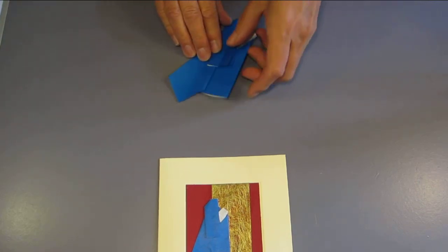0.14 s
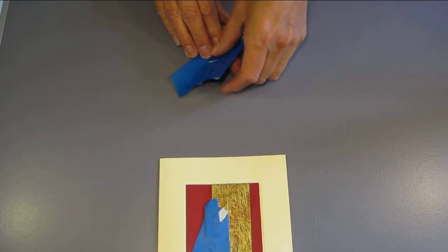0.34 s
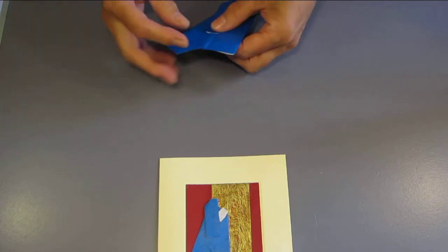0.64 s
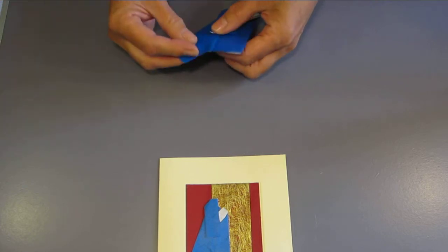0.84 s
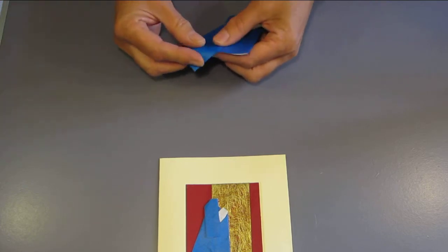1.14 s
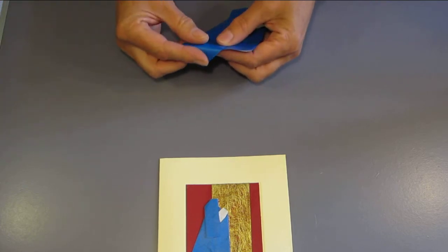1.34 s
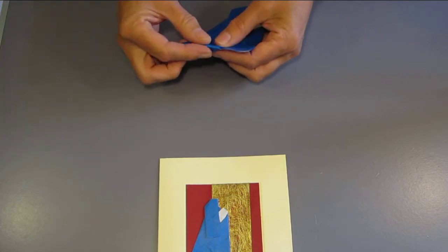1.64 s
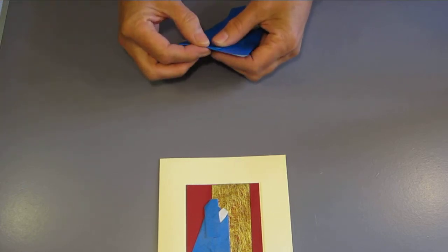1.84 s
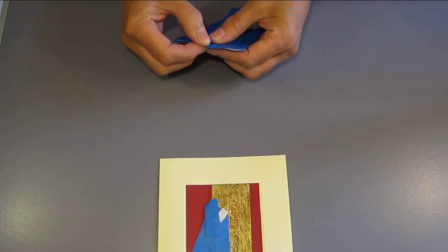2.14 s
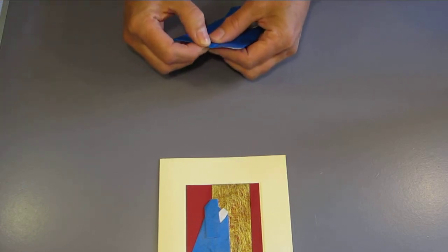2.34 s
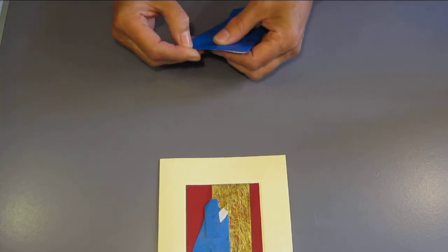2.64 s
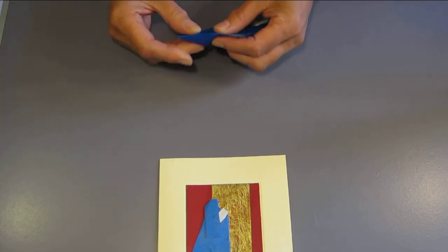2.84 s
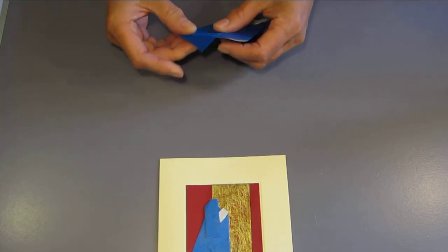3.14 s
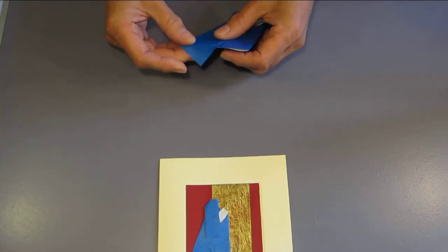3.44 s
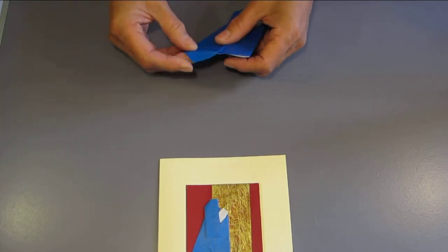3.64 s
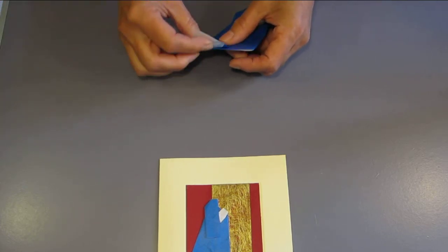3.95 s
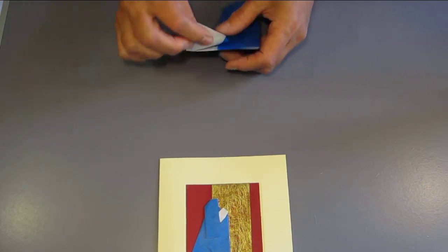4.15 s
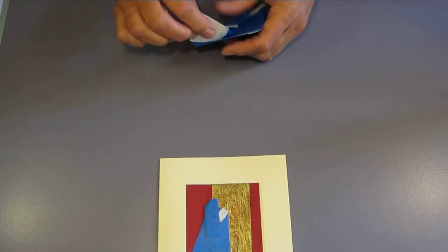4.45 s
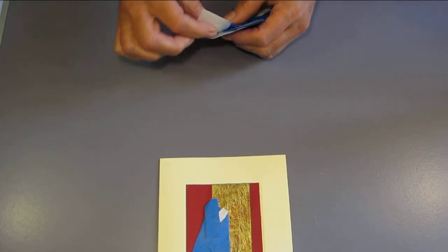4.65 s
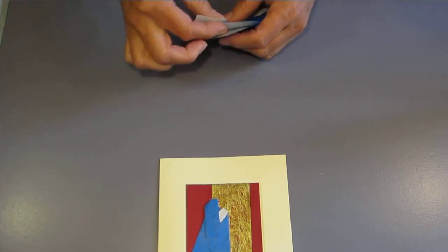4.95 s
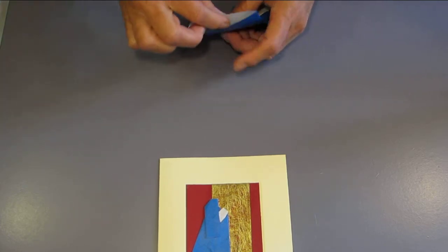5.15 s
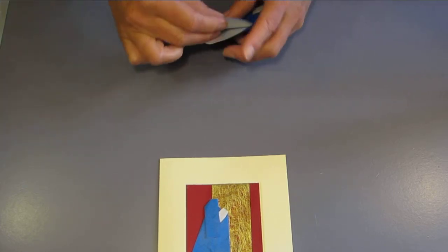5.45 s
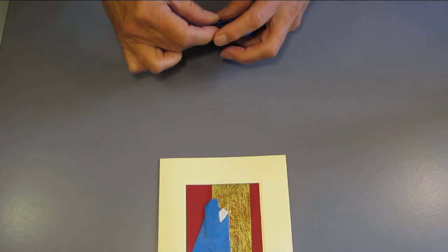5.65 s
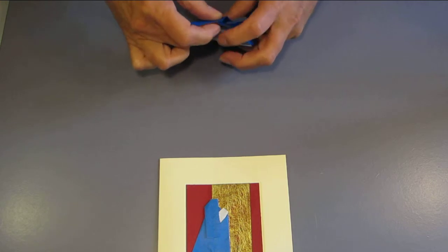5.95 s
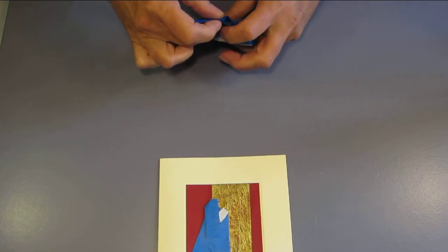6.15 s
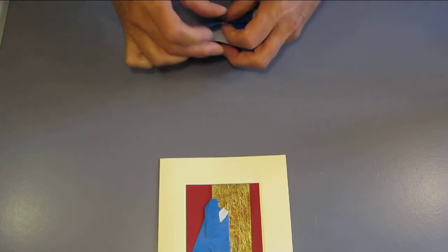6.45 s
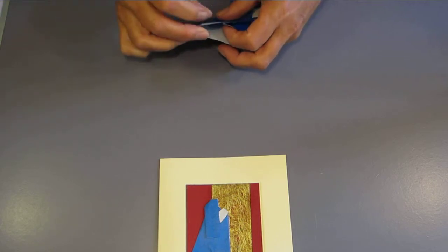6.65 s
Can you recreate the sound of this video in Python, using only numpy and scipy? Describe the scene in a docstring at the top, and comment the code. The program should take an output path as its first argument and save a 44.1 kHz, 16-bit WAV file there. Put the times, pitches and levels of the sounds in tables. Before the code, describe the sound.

Close to the microphone in a small room, fingers fold stiff paper. Dull table scuffs and crisp crackles open, followed by scattered snaps and light rubbing. The handling softens, then grows harder after four seconds, with one sharpest crease near six. Low ventilation hum, soft hiss and a very thin high whine stay underneath.

```python
"""Close to one microphone in a small room, two hands fold a small sheet of stiff paper just above a table.
Ventilation hum, hiss and a thin whine (filtered noise) lie under it all; at first the sheet scuffs the
tabletop (ringing noise), with three fainter scuffs later. Fingers and layers rub with gritty hiss and tiny
ticks, and creases snap (millisecond slip bursts): crisp in the first two seconds, softer up to about four,
then harder, the hardest at 6.06 s. The room answers each sound with a short tail."""
import sys
import numpy as np
from scipy import signal
from scipy.fft import rfft, irfft
from scipy.io import wavfile
from scipy.ndimage import uniform_filter1d

SR = 44100
rng = np.random.default_rng(int(sys.argv[2]) if len(sys.argv) > 2 else 0)


def wrap_up_sound(samples):
    """Save the sound to the file named by the first command line argument, as 16-bit audio."""
    columns = np.atleast_2d(samples).T
    # keep every value between -1 and 1, then stretch to whole-number steps
    tamed = np.clip(columns, -1, 1)
    steps = np.round(tamed * 32767).astype(np.int16)
    wavfile.write(sys.argv[1], SR, steps)


N = 299439
TOP_HZ = 16000  # upper limit of the recorder and of every resonance


def undb(db):
    """Decibels to gain."""
    return 10 ** (np.asarray(db) / 20)


def unit(x):
    """Scale to rms 1."""
    return x / np.sqrt(np.mean(x ** 2))


def colour(x, points):
    """Shape x with a spectrum of (frequency [Hz], level [dB]) points, joined over log frequency."""
    hz, db = np.transpose(points)
    f = np.maximum(np.fft.rfftfreq(len(x), 1 / SR), 1)
    gain = undb(np.interp(np.log(f), np.log(hz), db))
    return irfft(rfft(x) * gain, len(x))


def ring(x, hz, q):
    """A resonance with gain 1 at its centre."""
    b, a = signal.iirpeak(min(hz, TOP_HZ), max(q, 1), fs=SR)
    return signal.lfilter(b, a, x)


def walk(rate):
    """Slow chance: `rate` random levels a second joined by ramps, rms 1."""
    size = max(int(SR / rate), 2)
    steps = np.repeat(rng.standard_normal(N // size + 1), size)
    return unit(uniform_filter1d(steps, size)[:N])


def slips(rate, spread_db):
    """Tiny stick-slip clicks at random moments, `rate` a second, a few much larger than the rest."""
    size = undb(spread_db * np.minimum(rng.exponential(size=N), 5))
    happens = rng.random(N) < rate / SR
    return unit(happens * size * rng.choice([-1, 1], N))


def even(x, smooth):
    """Spread a burst's energy more evenly over frequency, keeping its timing."""
    spectrum = rfft(x)
    power = uniform_filter1d(np.abs(spectrum) ** 2, size=9)
    floor = power.mean() / 20
    return irfft(spectrum / (power + floor) ** (smooth / 2), len(x))


# ventilation hum before its level below: (frequency [Hz], density [dB per Hz])
HUM_SPECTRUM = [(20, -88.5), (60, -90.5), (130, -92), (220, -93), (330, -97), (600, -103), (1200, -112),
                (4000, -135)]
# the hum eases, swells slightly around the middle, then eases further: (time [s], level [dB])
HUM_EASING = [(0, 3), (1.203, 1), (3.8, 2), (5.5, -0.5), (6.8, -1.5)]
# microphone hiss: (frequency [Hz], density [dB per Hz])
HISS_SPECTRUM = [(300, -105), (1300, -103.5), (2500, -106), (5000, -109), (10000, -112), (13000, -116),
                 (16000, -122)]
# whine of the electronics: (frequency [Hz], half the bandwidth of each filter pass [Hz], rms level [dB])
WHINE_LINES = [(7840, 76, -81), (13450, 82, -89)]


def background(waver_db=1):
    """Broadband noise wavers as ventilation hum or stays steady as hiss; narrow noise bands whine."""
    hum_db = np.interp(np.arange(N) / SR, *np.transpose(HUM_EASING)) + waver_db * walk(rate=5.5)
    hum = colour(rng.standard_normal(N), HUM_SPECTRUM) * undb(hum_db)
    hiss = colour(rng.standard_normal(N), HISS_SPECTRUM)
    whine = 0
    for hz, half_width, db in WHINE_LINES:
        q = hz / half_width / 2
        line = ring(ring(rng.standard_normal(N), hz, q), hz, q)
        whine = whine + undb(db) * unit(line)
    return (hum + hiss) * np.sqrt(SR / 2) + whine  # from density per Hz to sample level


# colour of the room's answer: (frequency [Hz], level [dB])
ROOM_COLOUR = [(150, 1), (500, 7), (700, -0.5), (1000, 5), (1500, -1.5), (2400, -2), (3200, -2), (4100, 4),
               (6000, -2), (9000, -1.5), (12000, -6.5), (15000, -5)]


def room(x, t60=0.33, tail_db=-8, early_db=-14, early_s=0.011, gap_s=0.0033, build_s=0.0051):
    """Quick scatter from hands and table, then the diffuse tail of the walls."""
    t = np.arange(SR // 2) / SR
    late = np.maximum(t - gap_s, 0)
    tail = rng.standard_normal(len(t)) * (1 - np.exp(-late / build_s)) * np.exp(-np.log(1000) * t / t60)
    sparse = rng.standard_normal(len(t)) ** 3  # cubing leaves a few strong reflections
    early = sparse * (t > gap_s / 2) * np.exp(-t / early_s)
    response = (undb(tail_db) * unit(tail) + undb(early_db) * unit(early)) / np.sqrt(len(t))
    return colour(signal.fftconvolve(x, response), ROOM_COLOUR)[:N]


def echo(x, lag_s=0.016, hz=1950, db=-13):
    """One dull reflection from a nearby surface."""
    return undb(db) * np.pad(ring(x, hz, q=1.8), (int(lag_s * SR), 0))[:N]


# paper and fingertips drag on the table:
# (start time [s], length [s], resonance [Hz], level [dB], about 3 dB above the drag's rms)
TABLE_DRAGS = [(0.0, 0.07, 501, -61.5), (0.316, 0.012, 516, -51), (0.331, 0.026, 503, -61),
               (0.36, 0.029, 497, -50.5), (1.638, 0.038, 662, -60.5), (2.856, 0.027, 497, -57.5),
               (3.1, 0.03, 694, -60.5)]


def drags(q=8, upper_db=-8):
    """Stick-slip on the tabletop: noise through two resonances makes a dull, hollow scuff."""
    t, out = np.arange(N) / SR, 0
    friction = rng.standard_normal(N)
    for s, length, hz, db in TABLE_DRAGS:
        stroke = np.sqrt(np.maximum(1 - (2 * (t - s) / length - 1) ** 2, 0))
        lower = unit(ring(ring(friction, hz, q / 2), hz, q))
        upper = unit(ring(ring(friction, 1.53 * hz, q), 1.53 * hz, q))
        scuff = unit(stroke * (lower + undb(upper_db) * upper))
        out = out + undb(db) * scuff * np.sqrt(length * SR / N / 2)
    return out


# edges of the sheet's four registers, thud, body, crack and fizz: (frequency [Hz])
REGISTER_EDGES = [350, 1050, 2900, 7200, 16000]


def register(x, index):
    """One of the sheet's four registers."""
    band = REGISTER_EDGES[index:index + 2]
    return signal.sosfilt(signal.butter(3, band, "bandpass", fs=SR, output="sos"), x)


# how well the sheet radiates: (frequency [Hz], level [dB])
SHEET_RADIATION = [(350, 2), (700, 8), (950, -3.5), (1350, 0.5), (1750, -1), (2400, 1.5), (3600, 2),
                   (5000, 8.5), (7500, -2), (9400, -2.5), (12000, -3), (13200, -8.5), (15500, -12),
                   (16200, -19)]


def radiate(x):
    """The thin sheet sends some frequencies into the air better than others."""
    return colour(x, SHEET_RADIATION)


# the held sheet rustles faintly under the fingers, level at step 0: (time [s], level [dB])
GRIP_RUSTLE = [(0, -68.5), (.48, -68.5), (.64, -74), (1, -69.5), (1.7, -80), (2.05, -75.5), (2.63, -81),
               (3.05, -74), (3.25, -82), (3.7, -68.5), (4.7, -67), (5.15, -75), (5.45, -68), (6.18, -68.5),
               (6.33, -73.5), (6.62, -81), (6.79, -69.5)]
# a finger or a layer of paper slides: (start time [s], length [s], share of length spent speeding up,
# peak level at step 0 [dB], brightness [dB per step])
SLIDE_STROKES = [(0.0, 0.041, 0.13, -59.5, 10), (0.085, 0.16, 0.34, -63.5, 2),
                 (0.193, .12, 0.18, -61.5, 3.5), (0.312, 0.15, 0.26, -57, -6),
                 (0.734, 0.12, 0.6, -68.5, -6), (0.805, 0.16, 0.39, -66, 7), (1.3, 0.07, 0.8, -62, 7.5),
                 (1.4, 0.24, 0.5, -66.5, 4), (1.769, 0.13, 0.13, -62, 9), (1.97, 0.12, 0.88, -67.5, 3),
                 (2.383, 0.14, .1, -63, 8), (2.431, 0.17, 0.68, -62, 8), (2.665, .11, 0.62, -61.5, 4),
                 (2.795, 0.12, 0.4, -63, 1), (2.905, 0.063, 0.64, -64, -2.5), (3.079, .08, 0.58, -64, 5),
                 (3.394, 0.13, 0.37, -66, 3), (3.5, 0.12, 0.36, -67.5, -10.5), (3.57, .15, .6, -66.5, 1),
                 (3.735, 0.2, 0.25, -64.5, 5), (3.908, 0.17, 0.56, -66, -6),
                 (4.031, 0.17, 0.81, -59.5, 9.5), (4.275, 0.18, 0.33, -59.5, 2),
                 (4.462, 0.084, .45, -60.5, 1), (4.533, 0.091, 0.48, -57, 7), (4.62, 0.2, 0.17, -65.5, 8),
                 (4.797, 0.11, 0.97, -57.5, 9.5), (4.967, 0.048, 0.61, -61, 1), (5.005, 0.13, .2, -66, -4),
                 (5.212, 0.028, 0.68, -55, -2), (5.238, 0.0273, 0.87, -40.5, 8.5),
                 (5.45, 0.15, .08, -62.5, -5), (5.683, 0.099, .4, -67, -7), (5.821, .03, .7, -65.5, -2),
                 (5.844, 0.1, 0.17, -53, 2.5), (6.004, 0.057, 0.82, -61, -6), (6.037, 0.11, .17, -54, 4),
                 (6.372, .13, 0.25, -55, 2), (6.666, .09, 0.32, -64, 1)]
# grip brightness [dB per step]; how rounded a stroke's swell is (1 = a sine arch)
GRIP_BRIGHT_DB, STROKE_CURVE = -2, 0.93


def sliding(step):
    """Friction level, brightness weighted by `step`: below 0 for duller registers, above 0 for the fizz."""
    t = np.arange(N) / SR
    power = undb(np.interp(t, *np.transpose(GRIP_RUSTLE)) + step * GRIP_BRIGHT_DB) ** 2
    for s, length, share, db, bright_db in SLIDE_STROKES:
        span = (t > s) & (t < s + length)
        turn = np.clip(share, .02, .98)
        progress = np.interp((t[span] - s) / length, [0, turn, 1], [0, 1, 0])
        speed = np.sin(np.pi / 2 * progress)
        power[span] += (undb(db + step * bright_db) * speed ** STROKE_CURVE) ** 2
    return np.sqrt(power)


# resonances of the folded panels under the fingers: (frequency [Hz])
PANEL_RESONANCES = [1300, 2100, 2900, 4800, 5700, 6900, 8600, 9600, 11500]


def rubbing(grit_db=-4, thud_db=-7, body_db=0.0, crack_db=0.5, fizz_db=-0.74,
            judder_db=2.0, panel_db=-6, shift_db=5):
    """Sliding hiss and catching fibres ring panels, each wandering in level on its own as the grip shifts."""
    body, crack, fizz = sliding(-0.47), sliding(0), sliding(0.75)
    friction = rng.standard_normal(N) + undb(grit_db) * slips(rate=800, spread_db=2.0)
    friction = friction * undb(judder_db * walk(rate=55))
    panels = 0
    for hz in PANEL_RESONANCES:
        shifting_db = panel_db + shift_db * np.tanh(walk(rate=7.8))
        panels = panels + undb(shifting_db) * ring(friction, hz, q=7.0)
    sheet = radiate(friction + panels)
    gains = (undb(thud_db) * body, undb(body_db) * body, undb(crack_db) * crack, undb(fizz_db) * fizz)
    return sum(gain * unit(register(sheet, index)) for index, gain in enumerate(gains))


def crackle(rate=45, crackle_db=-8, ring_db=-2):
    """Single fibres let go with tiny ticks, louder where the paper is worked harder."""
    ticks = slips(rate, spread_db=5.5)
    panels = sum(2 * ring(ticks, hz, q=2.6) for hz in PANEL_RESONANCES)
    ticks = ticks + undb(ring_db) * panels
    ticks = radiate(sum(register(ticks, index) for index in range(1, 4)))  # no thud
    return unit(ticks) * undb(crackle_db) * sliding(0)


# the sheet buckles: (time [s], base level as rms over 1 ms [dB], brightness [dB]: added to the fizz and
# taken from thud and body, ring of the panel [Hz], ring level [dB], decay time constant [ms])
BUCKLES = [(0.032, -56, 6, 4600, 13, 3), (0.099, -35.5, -0.5, 4530, 37, 1.3),
           (0.1125, -34.5, -0.5, 4600, 39, 1.5), (0.2142, -36, 1.5, 4240, 19, 3),
           (0.2314, -46.5, -5.5, 3990, -1, 1.4), (0.342, -41.5, -6, 3250, 7, 1.7),
           (0.3951, -34, 0, 2890, 6, 1.7), (0.74, -53.5, -11, 1820, -3, 1.4),
           (0.8656, -58, -14, 1750, 12, 1.6), (0.96, -47, -10.5, 2100, 24, 1.5),
           (0.9715, -25.5, 4.5, 4140, 11, 1.2), (1.08, -38, -0.5, 8160, 0, .9),
           (1.137, -34, 1, 11900, 4, 0.75), (1.2308, -46, -4, 2100, 0, 1.3),
           (1.3849, -45.5, 3.5, 7400, 2, 1.5), (1.391, -43, 5.5, 11000, 8, 1.3),
           (1.5103, -46.5, 2, 6560, 3, 0.8), (1.5388, -42, 8.5, 10300, 23, 0.33),
           (1.5411, -38.5, 0.5, 7070, 10, 1.5), (1.6065, -58, 5, 10870, 5, .6),
           (1.652, -60.5, -14, 1290, 19, 1.1), (1.699, -53, 8, 4950, 7, .8),
           (1.7715, -50, 10.5, 10600, 10, 0.9), (1.7972, -31.5, 4, 12900, -5, 2.2),
           (1.8305, -39.5, 8.5, 2180, 21, 0.87), (1.9764, -37, 2, 11400, 15, 0.9),
           (2.103, -61.5, -15, 1690, 2, 2), (2.1486, -44.5, -9, 2300, 4, 1.3),
           (2.2167, -48, 11.5, 13000, -5, 0.6), (2.222, -42.5, 0.5, 2420, 0, 2.2),
           (2.3031, -46, 8.5, 5920, -2, 1), (2.3363, -53.5, -11.5, 2340, 10, .6),
           (2.377, -59.5, -10.5, 1200, 13, 3.2), (2.4933, -55.5, -10, 1940, 6, 1.5),
           (2.6634, -52.5, -9, 3340, 3, 1.4), (2.75, -54, 6, 8460, 3, .9), (2.8138, -52, 3, 5000, 0, 1.5),
           (2.841, -55, -7.5, 1280, 16, 2), (3.0333, -42.5, 3, 2200, 3, 3.2),
           (3.104, -57.5, -13.5, 1350, 18, 5.4), (3.1391, -39.5, 2, 1200, 8, 2.4),
           (3.461, -57.5, -10, 1400, 14, 2.2), (3.516, -40, 2, 2770, -1, 1),
           (3.9211, -34.5, -4.5, 3060, 0, 1.3), (3.9465, -36.5, -2.5, 2760, -9, 1.8),
           (4.1161, -31.5, 3.5, 2740, 1, 2.6), (4.185, -30.5, 7, 4400, 19, 0.72),
           (4.276, -35, 3, 8600, 1, 2), (4.485, -50, -4, 2890, -9, 2.2), (4.506, -41.5, -1, 5000, -2, 3),
           (4.643, -34, 2, 5400, 22, 1.2), (4.6535, -40.5, -4, 603, 21, 1.9),
           (4.9416, -42, -1.5, 2600, -7, 1.3), (5.193, -45.5, -1, 6830, 3, 7.3),
           (5.2215, -49, -6, 2520, 5, 2.6), (5.2599, -26, 8, 4370, 9, 0.99),
           (5.266, -26.5, 1.5, 2270, 9, 1.2), (5.3933, -48.5, -5, 1130, 8, 2),
           (5.4238, -52, -6.5, 1560, 3, 3), (5.4615, -25.5, 5, 5800, 13, 0.95),
           (5.504, -40.5, 0, 2320, 7, 1.4), (5.5575, -50.5, -9, 3710, 7, 2.1),
           (5.574, -34.5, 5, 2380, 12, 1.2), (5.5851, -38.5, 0, 2100, 5, 2.6),
           (5.7416, -55.5, -6, 2600, 10, 1.7), (5.8495, -25, 0, 4730, -6, 0.78),
           (6.0298, -27.5, -1, 2180, 26, 2.7), (6.064, -17.5, 0.7, 4180, 11, 3.3),
           (6.457, -33.5, -1.5, 2440, 15, 4.1)]
# a longer avalanche also builds up more slowly: build-up time over decay time
BUILD_SHARE = 0.2
# every snap is a little stronger in the crack register [dB]
SNAP_CRACK_DB = 1.76
# thud of a middling snap [dB], that snap's level [dB], and dB less thud per dB of level: hard snaps are drier
SNAP_THUD_DB, MIDDLING_DB, DRYING = -15, -38.5, 0.22


def snaps(ring_q=5, flutter_db=-21, flutter_ms=5, lead_ms=0.18):
    """A crease gives way in an avalanche of fibre slips that rings a panel; the sheet flutters briefly after."""
    size, lead = 2048, 400  # samples per burst, and those before the table's time
    out = np.zeros(N + 2 * size)
    ms = (np.arange(size) - lead) / SR * 1000
    after, before = np.maximum(ms + lead_ms, 0), np.minimum(ms + lead_ms, 0)
    for s, level_db, bright_db, hz, ring_db, decay_ms in BUCKLES:
        onset = np.exp(before / (BUILD_SHARE * decay_ms))
        flutter = undb(flutter_db) * np.exp(-after / flutter_ms)
        force = onset * (np.exp(-after / decay_ms) + flutter)
        fibre_slips = force * rng.choice([-1, 1], size)
        burst = even(fibre_slips, smooth=.7) * np.sqrt(onset)
        burst = radiate(burst + undb(ring_db) * ring(burst, hz, ring_q))
        start = max(int(s * SR) - lead, 0)
        thud_db = SNAP_THUD_DB - DRYING * (level_db - MIDDLING_DB)
        register_db = (thud_db - bright_db, -bright_db, SNAP_CRACK_DB, bright_db)
        for index, db in enumerate(register_db):
            part = unit(register(burst, index)) * np.sqrt(SR / 1000 / size)  # rms 1 if packed into 1 ms
            out[start:start + size] += undb(level_db + db) * part
    return out[:N]


def scene():
    """The paper close to the microphone, its echo and room, and the background."""
    paper = snaps() + rubbing() + drags() + crackle()
    return (paper + echo(paper) + room(paper) + background())[None]


def record(dry):
    """The recorder cuts the top."""
    return signal.sosfilt(signal.ellip(10, .2, 70, TOP_HZ, fs=SR, output="sos"), dry)


dry = scene()
out = record(dry)
wrap_up_sound(out)
```